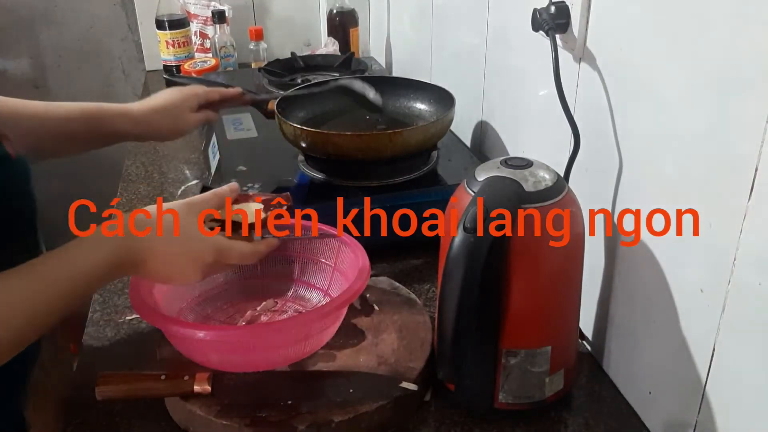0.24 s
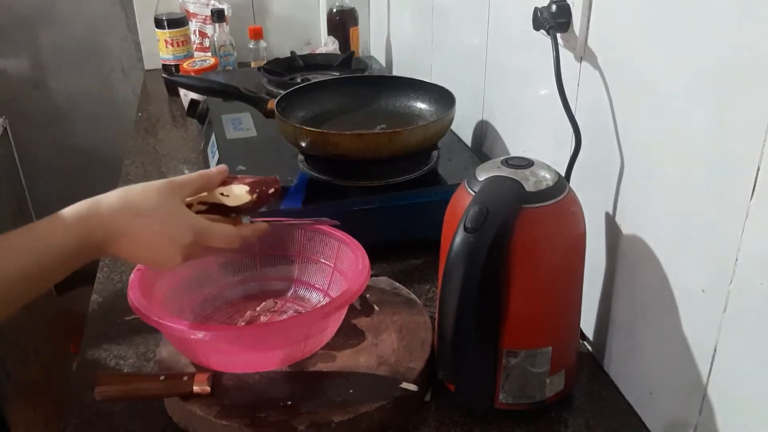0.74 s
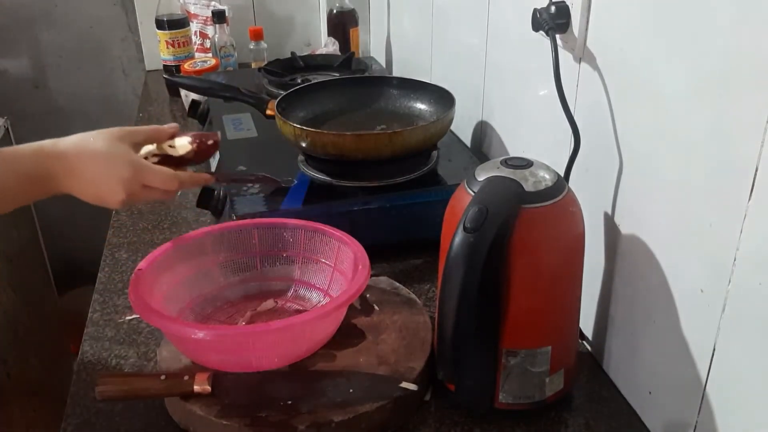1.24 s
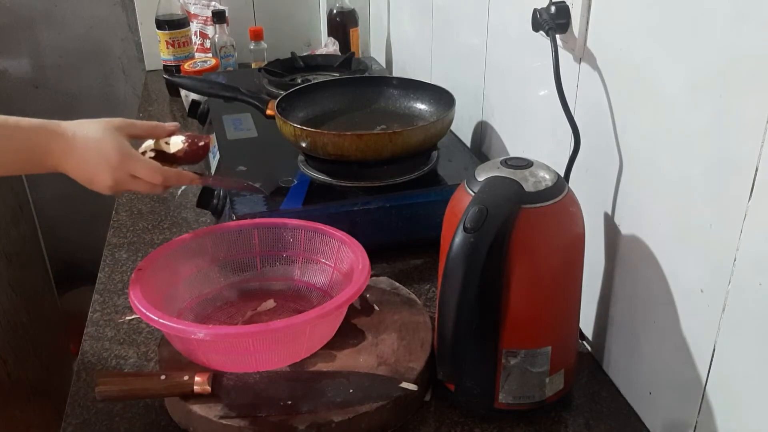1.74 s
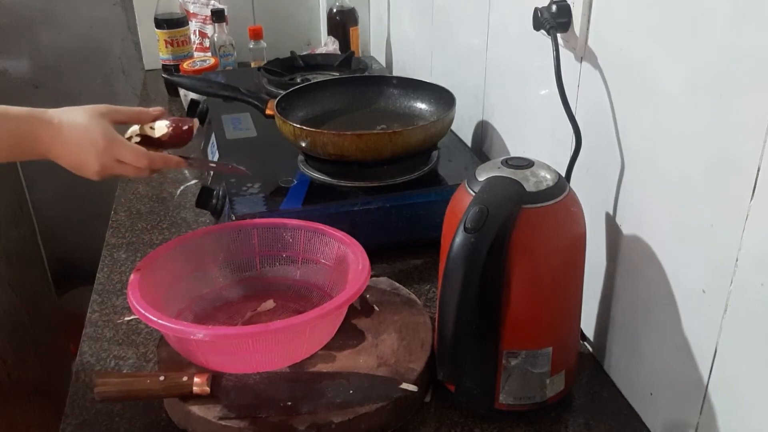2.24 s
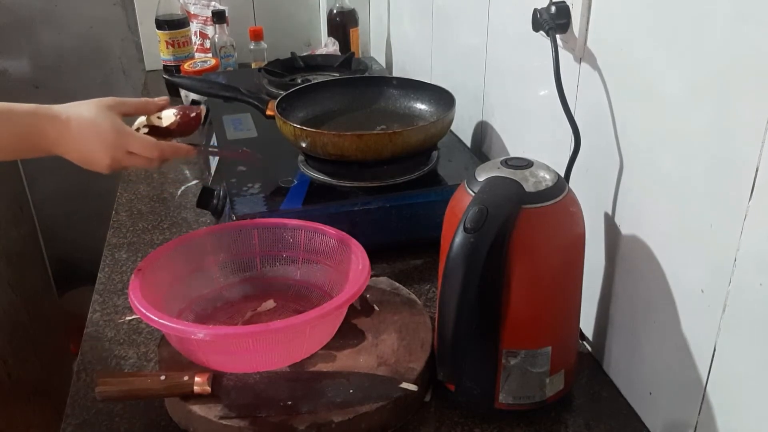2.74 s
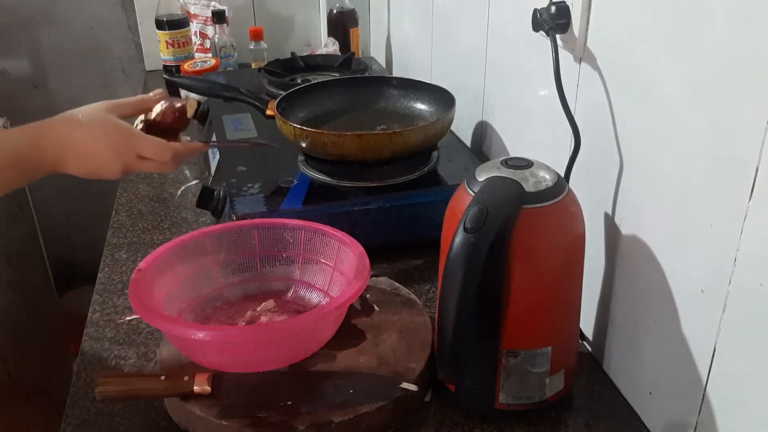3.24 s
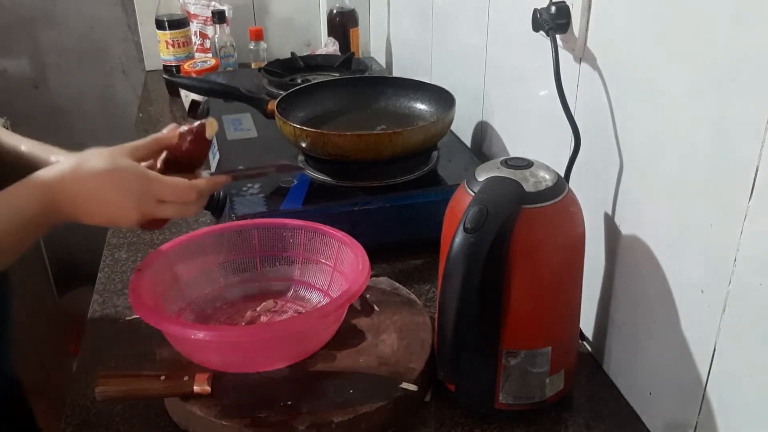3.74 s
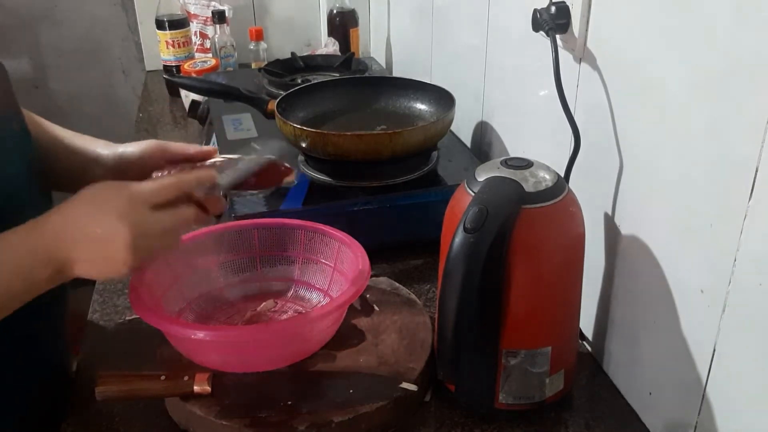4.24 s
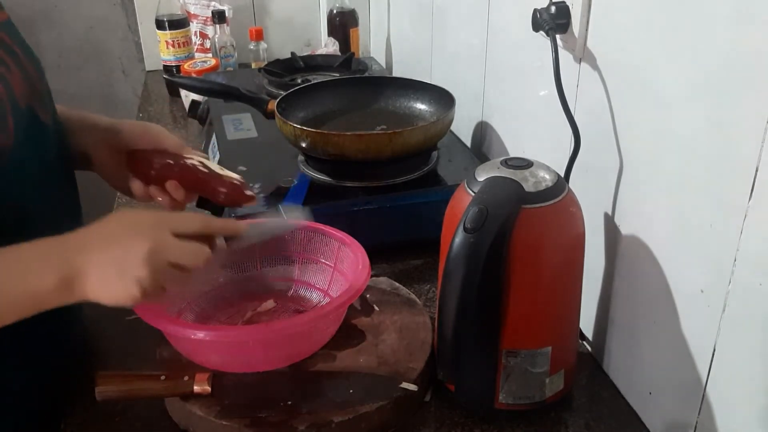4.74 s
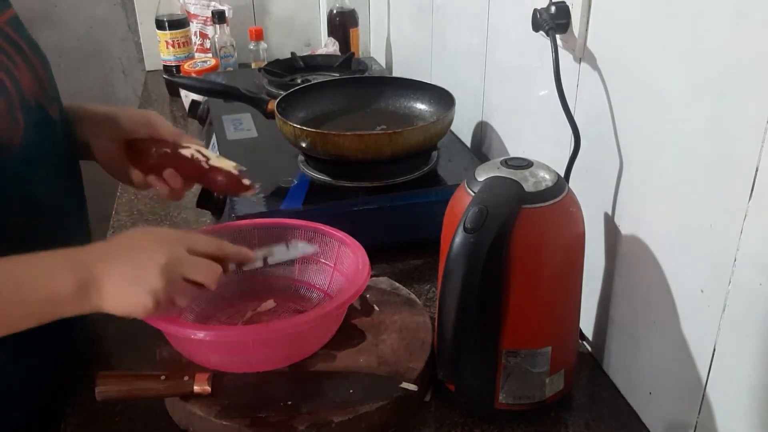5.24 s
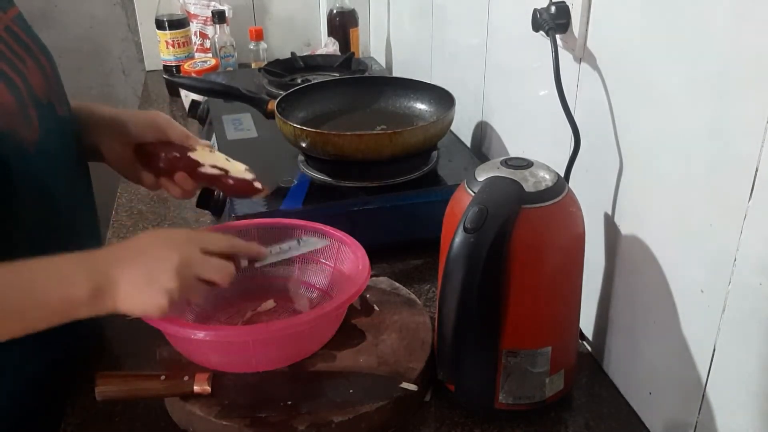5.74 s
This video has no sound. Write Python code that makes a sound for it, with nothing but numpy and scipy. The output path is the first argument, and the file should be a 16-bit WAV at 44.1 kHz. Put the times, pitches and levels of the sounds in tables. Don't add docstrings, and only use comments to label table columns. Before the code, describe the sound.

Knocks, ringing metal and a loud bowl landing echo in a small kitchen, followed by crisp close shaving strokes over a low swelling engine hum.

```python
import sys
import numpy as np
from scipy import signal
from scipy.fft import rfft, irfft, next_fast_len
from scipy.io import wavfile
from scipy.ndimage import uniform_filter1d

SR = 44100
rng = np.random.default_rng(int(sys.argv[2]) if len(sys.argv) > 2 else 0)


def volts(x):
    e = np.asarray(x, float) / 20
    return 10 ** e


def transcribe(u):
    v = np.clip(np.atleast_2d(u).T, -1, 1)
    q = np.round(v * 32767).astype(np.int16)
    wavfile.write(sys.argv[1], SR, q)


N = 264159


def evened(x):
    return x / np.sqrt(np.mean(x ** 2) + 1e-20)


def read(points, hz):
    f, value = np.transpose(points)
    return np.interp(np.log(hz + 1), np.log(f + 1), value)


def add(mix, s, sound):
    part = mix[..., round(s * SR):][..., :sound.shape[-1]]
    part += sound[..., :part.shape[-1]]


def columns(rows):
    return np.interp(np.arange(N) / SR, *np.transpose(rows))


def colour(x, points):
    size = next_fast_len(len(x) + 2048)
    gain = volts(read(points, np.fft.rfftfreq(size, 1 / SR)))
    return irfft(rfft(x, size) * gain, size)[:len(x)]


def resonate(x, hz, width):
    turn = np.exp(2j * np.pi * hz * np.arange(x.shape[-1]) / SR)
    r = np.exp(-np.pi * width / SR)
    return 2 * (turn * signal.lfilter([1 - r], [1, -r], x / turn)).real


# freq_hz, likeness (-1..1)
LIKENESS = [(60, 1), (180, 0.86), (550, 0.55), (1650, -0.25), (4970, -0.14), (15000, -0.18)]


def alike(hz):
    return np.clip(read(LIKENESS, hz), -1, 1)[:, None]


def diffuse(points, patchy_db):
    hz = np.fft.rfftfreq(2048, 1 / SR)
    a, b, c, d, patches = rng.standard_normal((N // 512 + 6, 1025, 5)).T
    patches = uniform_filter1d(patches, size=14, axis=0)
    patches = evened(uniform_filter1d(patches, size=7, axis=1))
    same, left = alike(hz), a + 1j * b
    right = same * left + np.sqrt(1 - same ** 2) * (c + 1j * d)
    z = np.array([left, right]) * volts(read(points, hz)[:, None] + patchy_db * patches)
    return evened(signal.istft(z, nperseg=2048, noverlap=1536)[1][:, :N])


# freq_hz, level_db (per Hz)
ROOM_AIR = [(150, -33), (300, -5.5), (500, -11), (800, -13), (1150, -54), (1550, -23.5), (2200, -13.5),
            (3200, -27.5), (4400, -15), (5700, -19.5), (6500, -29), (8000, -24), (12000, -29),
            (16000, -31.5)]
# freq_hz, level_db, width_hz
FAINT_WHINES = [(216.3, -67, 8.6), (182.8, -70.5, 6.3), (331, -81, 4.5), (361.8, -80, 7.5),
                (980, -84, 80), (1540, -78.5, 130), (4380, -81, 120), (5880, -83, 90)]
# time_s, level_db
TRAFFIC = [(0, -55), (.33, -59.5), (.7, -64), (1.15, -68), (1.5, -69.5), (2.3, -68), (2.8, -66.5),
           (3.7, -68.5), (4.19, -62.5), (4.6, -56), (4.85, -59.5), (5.15, -59), (5.35, -63.5), (6.1, -70.5)]
# freq_hz, level_db (per Hz)
TRAFFIC_RUMBLE = [(15, -59), (28, -45), (40, -39), (52, -21), (66, -1), (82, 1.5), (100, -8.5), (125, -4.5),
                  (160, -12.5), (215, -8.5), (260, -42), (320, -24), (500, -52)]
# freq_hz, level_db (per Hz)
TRAFFIC_ROAR = [(150, -6.5), (250, 0.5), (408, -5), (616, -8.5), (956, -9.5), (1140, -10), (1540, -7.5),
                (1680, -10), (4040, -17), (5000, -27), (6500, -20), (11000, -120)]


def background():
    traffic_db = columns(TRAFFIC)
    busy_db = traffic_db + 67
    air = volts(-67 + 0.31 * busy_db) * diffuse(ROOM_AIR, patchy_db=-1.0)

    seed = diffuse([(0, 0), (9, 0.0046)], patchy_db=-3.5)
    size = next_fast_len(N)
    bins = np.fft.rfftfreq(size, 1 / SR)
    bands = sum(volts(db) * evened(1 / (1 + (2 * (bins - hz) / width) ** 2))
                for hz, db, width in FAINT_WHINES)
    whines = irfft(rfft(seed, size) * bands, size)[:, :N]

    rumble = volts(-58.5 + 0.34 * busy_db) * diffuse(TRAFFIC_RUMBLE, patchy_db=1.5)
    roar = volts(traffic_db) * diffuse(TRAFFIC_ROAR, patchy_db=2.0)
    hum = air + whines
    hum[1] = np.roll(hum[1], shift=16)
    phase = 2 * np.pi * 11827 * np.arange(N) / SR
    tone = volts(-90) * np.sin(phase + np.array([[0], [1]]))
    return hum + rumble + roar + tone


def blows(events, body, ring_db, split):
    crack, modes = body
    out, t = np.zeros((2, 2, N)), np.arange(SR // 2) / SR
    hz, width, level_db = np.transpose(modes)[:, :, None, None, None]
    pair = hz + split * width * np.array([[[-1]], [[1]]])
    decay = volts(level_db) * np.sqrt(width) * np.exp(-np.pi * width * t)
    for s, db, contact, pan_db in events:
        contact = max(contact, .0005)
        push = rng.standard_normal(len(t)) * np.exp(-t / contact)
        push = irfft(np.exp(1j * np.angle(rfft(push))), len(t))
        push *= np.exp(-t / (3 * contact))
        waves = np.sin(2 * np.pi * (pair * t + rng.random((len(modes), 2, 2, 1))))
        ring = (decay * waves).sum((0, 1)) * (1 - np.exp(-t / contact))
        parts = np.array([evened(colour(push, crack)) * np.ones((2, 1)), volts(ring_db) * evened(ring)])
        add(out, s, volts(db - 12.5 + pan_db * np.array([[.5], [-.5]])) * parts)
    return out


# start_s, level_db, contact_s, left_right_db
TAP_TIMES = [
    (.225, -48, 0.0016, 2),
    (.24, -74, 0.0038, 13),
    (.282, -60, 0.0017, 10),
    (.315, -65, 0.012, 8),
]
# crack as freq_hz, level_db (per Hz); modes as freq_hz, width_hz, level_db
TAP_BODY = ([(100, -26), (300, -8), (450, -3.5), (900, -12), (2000, -11.5), (3500, -21), (5000, -24),
             (9000, -39)], [(390, 17, -9), (878, 16, -1.5), (1360, 28, -3), (1730, 16, -2.5), (2630, 38, 0),
             (3430, 15, -10), (2020, 14, -6)])


def taps():
    return blows(TAP_TIMES, TAP_BODY, ring_db=2.5, split=1.46)


# start_s, level_db, contact_s, left_right_db
BOARD_HITS = [
    (.5, -58, 0.0083, 1),
    (1.505, -47, 0.0021, 1),
    (1.516, -44.5, 0.0073, 1),
    (1.536, -46.5, 0.0066, 1),
    (1.57, -50, 0.0051, 1),
    (1.605, -67, 0.0085, 1),
]
# crack as freq_hz, level_db (per Hz); modes as freq_hz, width_hz, level_db
BOARD_BODY = ([(25, -43), (55, -6), (120, -10), (220, -12), (400, -15.5), (800, -16), (1500, -25),
               (3000, -27), (5000, -29), (7000, -47), (16000, -48)], [(214, 10, -8.5), (228.4, 11, -6),
               (287, 63, -6.5), (536, 22, -7), (1494, 30, -11)])


def board():
    return blows(BOARD_HITS, BOARD_BODY, ring_db=-3.5, split=0.65)


# start_s, bite_s, slide_s, level_db, brightness_db
BLADE_STROKES = [
    (1.491, 0.039, 0.048, -58, -14),
    (2.972, 0.011, 0.091, -60, -8),
    (4.5, 0.074, 0.054, -54, -6),
    (4.645, 0.028, 0.0089, -51, 6),
    (4.97, .012, .05, -80, -3),
    (5.062, 0.057, 0.075, -48.5, 3.5),
    (5.602, 0.016, 0.098, -49.5, 11),
    (5.79, 0.023, 0.032, -69.5, -6),
]
# freq_hz, level_db (per Hz)
FLESH_TEARS = [(400, -48), (900, -16), (1550, -7), (2500, -7), (4000, -3.5), (6400, -2), (8000, 0),
               (11000, -4), (16000, -11)]
# freq_hz, width_hz, level_db
BLADE_MODES = [(6400, 450, 3.5), (4950, 90, -35), (2530, 130, -16)]


def rub(level_db, tilt_db, surface, grains_per_s, spread_db):
    chance = rng.random(SR // 2)
    weight, sign = rng.exponential(1, SR // 2), rng.standard_normal(SR // 2)
    size = volts(spread_db * np.minimum(weight, 3)) * (chance < grains_per_s / SR)
    tears = colour(size * sign, surface)[:len(level_db)]
    low = signal.lfilter([.3], [1, -.7], tears)
    tears = volts(-tilt_db) * low + volts(tilt_db) * (tears - low)
    return volts(level_db) * evened(tears) * signal.windows.tukey(len(tears), .05)


def blade():
    bite_db, sag_db_per_s, lift_db_per_s, dull_db_per_s = 17, 36, 380, 54
    out = np.zeros(N)
    for s, bite, slide, db, bright_db in BLADE_STROKES:
        t = np.arange(0, bite + slide + .08, 1 / SR)
        level_db = db - bite_db * (1 - t / bite).clip(0) ** 1.13
        level_db -= sag_db_per_s * (t - bite).clip(0)
        level_db -= lift_db_per_s * (t - bite - slide).clip(0)
        tilt_db = (bright_db - dull_db_per_s * t).clip(-6, 6)
        add(out, s, rub(level_db, tilt_db, FLESH_TEARS, grains_per_s=10000, spread_db=3.5))
    return out + sum(volts(db - 5.0) * resonate(out, hz, width) for hz, width, db in BLADE_MODES)


# start_s, level_db, pitch_hz, t60_s
LANDINGS = [
    (1.507, -34, 226.6, 0.24),
    (1.534, -29.5, 228.4, 0.16),
    (1.566, -32.5, 198, 0.16),
    (1.598, -37, 216, 0.15),
    (1.93, -36, 250, 0.082),
    (2.316, -43.5, 550, 0.17),
    (2.399, -33.5, 338, 0.096),
    (2.422, -32, 119.6, 0.25),
    (2.464, -40, 333, 0.11),
    (2.638, -32, 476.6, 0.15),
]


def thumps():
    out, t = np.zeros(N), np.arange(SR // 4) / SR
    for s, db, hz, t60 in LANDINGS:
        swing = (1 - np.exp(-t / .005)) * np.sin(2 * np.pi * hz * t)
        add(out, s, volts(db - 60 * t / t60) * swing)
    return out


# start_s, level_db, contact_s, left_right_db
PING_TIMES = [
    (1.516, -53, 0.0023, 12),
    (2.273, -64.5, 0.0016, 3),
    (2.4085, -31.5, 0.0027, 5),
    (2.4325, -36.5, 0.00079, -1.5),
    (2.638, -63, 0.0056, 7),
    (4.982, -65.5, 0.0027, 11),
    (5.011, -70, 0.0018, 7),
    (5.035, -73, .002, 7),
]
# crack as freq_hz, level_db (per Hz); modes as freq_hz, width_hz, level_db
PING_BODY = ([(300, -22), (900, -5), (1500, -1), (2500, -15), (6000, -28)], [(1548, 76, -3.5),
             (2066, 130, -7.5)])


def pings():
    return blows(PING_TIMES, PING_BODY, ring_db=1, split=0.27).sum(0)


# start_s, level_db, contact_s, left_right_db
POT_HITS = [
    (1.868, -36, 0.002, 7.7),
    (1.882, -32, 0.00073, 0.8),
    (2.309, -49, 0.00065, 2.6),
    (2.402, -36, 0.00054, 1.37),
    (2.434, -40, 0.0017, 1.6),
    (2.525, -49, .002, 1.5),
    (2.6, -49, 0.0005, 2),
]
# crack as freq_hz, level_db (per Hz); modes as freq_hz, width_hz, level_db
POT_BODY = ([(30, -45), (60, -21), (95, -1), (140, -19), (300, -17.5), (1000, -21.5), (1550, -18),
             (1850, -15.5), (2400, -7.5), (2750, -5.5), (3250, -10.5), (3600, -12), (4200, -16), (5200, -8),
             (5700, -25), (6300, -4), (7150, -40), (7500, -22), (8000, -25), (11000, -22), (16000, -27)],
             [ (1443, 10, -9), (1505, 12, -2), (1556, 5, -6), (2040, 5, -10), (2361, 5, 1), (2337, 7, -3),
             (2719, 3.5, 0), (2764, 8, -2), (2945, 6, -12), (2685, 9, -5), (3590, 6, -10), (3634, 8, -8),
             (3505, 12, -10), (4897, 5, -5), (7315, 10, -2), (5080, 20, -8), (6282, 12, -7),
             (6870, 10, -14), (7870, 7.8, -9), (8480, 5.4, 7), (8300, 10.6, 13), (9640, 9.8, -2),
             (10590, 15, -2.5), (11090, 5, -5.5), (12100, 12, -25)])


def pot():
    return blows(POT_HITS, POT_BODY, ring_db=8, split=.7)


# start_s, length_s, first_db, last_db
BOWL_DRAGS = [
    (2.31, .091, -41, -28),
    (2.584, .025, -42, -35),
]
# freq_hz, level_db (per Hz)
COUNTER_GRIT = [(180, -42), (400, -1.5), (570, 5.5), (1000, -14.5), (1500, -2.5), (2500, -6), (4000, -3),
                (6300, -8.5), (10000, -7.5), (16000, -27.5)]


def drag():
    out = np.zeros(N)
    for s, length, first_db, last_db in BOWL_DRAGS:
        u = np.arange(0, length, 1 / SR) / length
        level_db = first_db + (last_db - first_db) * u ** 2.26
        add(out, s, rub(level_db, 0, COUNTER_GRIT, grains_per_s=13000, spread_db=3.5))
    return out


# start_s, level_db, contact_s, left_right_db
BOWL_HITS = [
    (2.317, -47, 0.014, 2.8),
    (2.397, -31, 0.002, 8.9),
    (2.402, -26.5, 0.0011, 0.86),
    (2.411, -43.5, 0.0011, 4),
    (2.419, -42, 0.00066, 2),
    (2.4245, -30.5, 0.00048, 1.2),
    (2.434, -43, 0.0012, 2),
    (2.6, -50.5, 0.018, 2.1),
    (2.645, -54.5, 0.0069, 2),
]
# crack as freq_hz, level_db (per Hz); modes as freq_hz, width_hz, level_db
BOWL_BODY = ([(40, -44), (120, -15), (180, -30), (280, -23), (400, 0), (550, 0.5), (1000, -0.5),
              (1550, -11), (2400, -2), (3200, -8), (4000, -12.5), (8000, -14), (12000, -23), (16000, -34)],
              [(125, 19, -26), (406, 18, -20), (497, 20.7, -3.5), (586, 6.5, -9), (709, 19, -11),
              (801, 15, -8), (963, 6.3, -7.5), (1117, 10, -15), (1233, 16, -8), (1498, 20.6, 6),
              (2100, 14, -3), (2632, 7.9, -9)])


def bowl():
    return blows(BOWL_HITS, BOWL_BODY, ring_db=-3.0, split=1.63)


# start_s, level_db, contact_s, left_right_db
EDGE_SLAPS = [
    (2.3968, -42, .0006, 11),
    (2.4015, -41, 0.00073, 4),
    (2.4185, -37, .0006, -1),
    (2.4245, -37, .0005, -3),
    (2.4395, -43.5, .0006, 2),
    (2.617, -52, 0.0014, -1),
]
# crack as freq_hz, level_db (per Hz); modes as freq_hz, width_hz, level_db
EDGE_BODY = ([(150, -14), (500, -6), (1200, -2), (2200, -2), (4000, -24), (9000, -30), (16000, -41)],
              [(1250, 300, 7), (2380, 440, -10)])


def slaps():
    return blows(EDGE_SLAPS, EDGE_BODY, ring_db=-4, split=1.0).sum(0)


# time_s, firing_hz
ENGINE_SPEED = [(2.6, 24.7), (3.15, 24.3), (3.5, 23.3), (4.0, 22.2), (4.3, 21.3), (4.85, 20.5), (5.2, 19.8),
                (5.55, 19.0), (5.99, 18.8)]
# order, centre_s, level_db, half_length_s
ORDER_SWELLS = [(2, 4.13, -59, 0.51), (2, 5.1, -62, 0.26), (3, 3.56, -54, 0.27), (3, 4.47, -41, 0.32),
                (3, 4.76, -45, 0.075), (3, 5.13, -55.5, 0.22), (3, 5.433, -48, 0.14), (3.5, 5.87, -57, 0.2),
                (7, 5.45, -61.5, 0.14), (3.5, 3.23, -53, 0.19), (3.5, 4.02, -59.5, 0.2),
                (4, 2.97, -55, 0.39), (4, 4.7, -49.5, 0.085), (4, 5.17, -37.5, 0.22),
                (4, 5.75, -56.5, 0.27), (5, 3.073, -48, 0.19), (5, 4.1, -60, 0.36), (5, 4.73, -53, 0.46),
                (5, 5.18, -44, 0.21), (5, 5.48, -50.5, 0.09), (5, 5.8, -53.5, 0.14), (6, 4.28, -63.5, 0.27),
                (6, 5.05, -55.5, 0.19), (7, 5.1, -60.5, 0.11)]


def engine():
    t, turns = np.arange(N) / SR, np.cumsum(columns(ENGINE_SPEED)) / SR
    out = np.zeros(N)
    for order, s, db, half in ORDER_SWELLS:
        swell = np.exp(-abs((t - s) / half) ** 2.5)
        out += np.sqrt(2) * volts(db) * swell * np.cos(2 * np.pi * order * (turns + .16))
    return out


# start_s, length_s, first_hz, last_hz, level_db
BIRD_CHIRPS = [
    (3.661, 0.028, 6770, 6720, -77.5),
    (3.739, 0.03, 5950, 5500, -78),
    (3.745, 0.09, 5360, 5260, -80),
    (3.875, 0.027, 5900, 5580, -75),
    (3.888, .09, 5700, 4170, -78),
    (3.946, 0.063, 5385, 4480, -81.5),
]


def bird():
    out = np.zeros(N)
    for s, length, first_hz, last_hz, db in BIRD_CHIRPS:
        u = np.arange(0, length, 1 / SR) / length
        hz = last_hz + (first_hz - last_hz) * np.exp(-u / .35)
        flutter = 1 + .4 * evened(uniform_filter1d(rng.standard_normal(len(u)), size=130))
        whistle = np.sin(2 * np.pi * np.cumsum(hz) / SR) * signal.windows.tukey(len(hz), .5)
        add(out, s, volts(db + 1.0) * flutter * whistle)
    return out


# start_s, level_db, contact_s, left_right_db
BLADE_SNAPS = [(4.607, -63, .003, 14), (4.67, -68, 0.0036, 5), (4.684, -55.5, 0.0027, 7),
               (5.073, -63.5, 0.0045, 13), (5.104, -74, 0.0033, 5), (5.191, -54.5, 0.0062, 7),
               (5.615, -72, .006, 4), (5.722, -55.5, 0.008, 7), (5.734, -60, 0.0048, 4),
               (4.538, -59, 0.0052, 6), (4.692, -65, .004, 2), (5.678, -66, .004, 4)]
# crack as freq_hz, level_db (per Hz); modes as freq_hz, width_hz, level_db
SNAP_BODY = ([(600, -27), (1300, -1), (2500, 5), (5000, 8), (8000, -4), (12000, 2), (16000, -19)],
              [(2470, 170, -9), (1340, 180, -6), (6130, 130, 5)])


def snaps():
    return blows(BLADE_SNAPS, SNAP_BODY, ring_db=-9, split=0.41).sum(0)


# freq_hz, t60_s
KITCHEN_T60 = [(60, 0.9), (250, 0.72), (700, 0.64), (2000, 0.61), (5000, 0.56), (12000, 0.39)]


def kitchen(x, build_s):
    echoes = np.zeros((2, SR))
    at = np.arange(100, SR - 20, 20) + rng.integers(0, 20, (2, (SR - 101) // 20))
    np.put_along_axis(echoes, at, rng.choice([-1., 1.], at.shape), 1)
    hz, t, z = signal.stft(echoes, SR, nperseg=512)
    same = alike(hz)
    z[1] = same * z[0] + np.sqrt(1 - same ** 2) * z[1]
    fade = volts(-60 * t / read(KITCHEN_T60, hz)[:, None])
    tail = signal.istft(z * fade, SR, nperseg=512)[1][:, :SR]
    tail *= (echoes.cumsum(1) ** 2).cumsum(1).clip(0, 1)
    tail *= 1 - np.exp(-np.arange(SR) / SR / build_s)
    return signal.fftconvolve(x, tail / np.linalg.norm(tail[0]), axes=1)[:, :N]


# freq_hz, side_db
PORT_SIDE = [(30, -24), (125, -16), (250, -2.5), (600, -4), (1200, 0)]


def ports(x):
    mid, side = x.mean(0), colour((x[0] - x[1]) / 2, PORT_SIDE)
    return np.array([mid + side, mid - side])


# freq_hz, level_db
ROOM_MODES = [(30, -21), (60, 1), (95, 0.5), (125, 8.5), (165, -1), (220, 5), (300, 0), (420, 5), (500, 0),
              (700, -1), (1000, 0.5)]


def scene():
    cracks, rings = taps() + board() + pot() + bowl()
    far = cracks + drag() * volts([[1.2], [-1.2]]) + volts(12.5) * bird()
    far[1] = np.roll(far[1], shift=16)
    echo = kitchen(far + volts(-5) * rings, build_s=.0025)
    echo = np.array([colour(channel, ROOM_MODES) for channel in echo])
    far = volts(-8) * far + volts(-2) * rings + echo + slaps()
    near = blade() * volts([[.9], [-.9]]) + pings() + snaps()
    near = volts(-5.0) * near + volts(-2.0) * kitchen(near, build_s=0.00097)
    return ports(far) + near + thumps() * volts([[-2], [-4.5]]) + engine() + background()


# freq_hz, level_db
MIC_HOUSING = [(20, 1), (1350, 0), (1550, 0), (1750, -1.5), (7900, -4), (8250, -20.5), (8600, -18),
               (9200, -13.5), (10500, -8), (12000, -0.5), (15000, 2)]


def microphone(dry):
    heard = np.array([colour(channel, MIC_HOUSING) for channel in dry])
    edge = signal.firwin(801, 15780, window=("kaiser", 9), fs=SR)
    return signal.oaconvolve(heard, edge[None], "same")


def low_pass(x):
    return signal.sosfilt(signal.butter(12, 16650, fs=SR, output="sos"), x)


def record(dry):
    heard = microphone(dry)
    return low_pass(heard)


dry = scene()
out = record(dry)
transcribe(out)
```